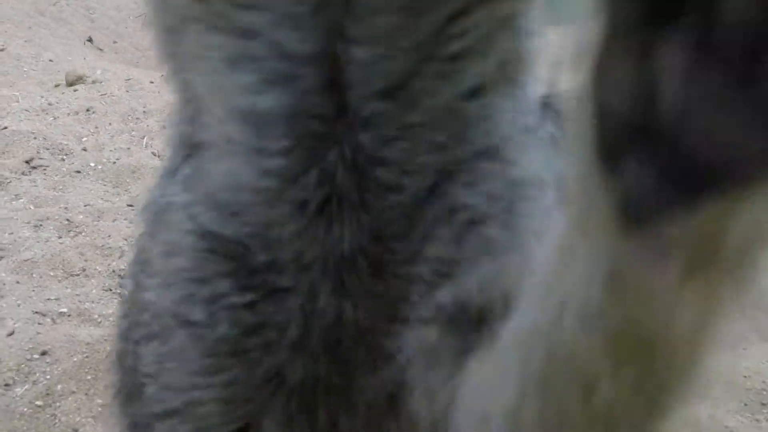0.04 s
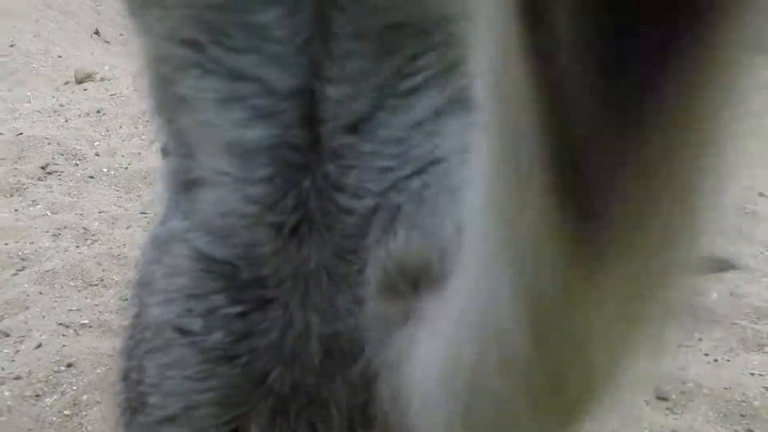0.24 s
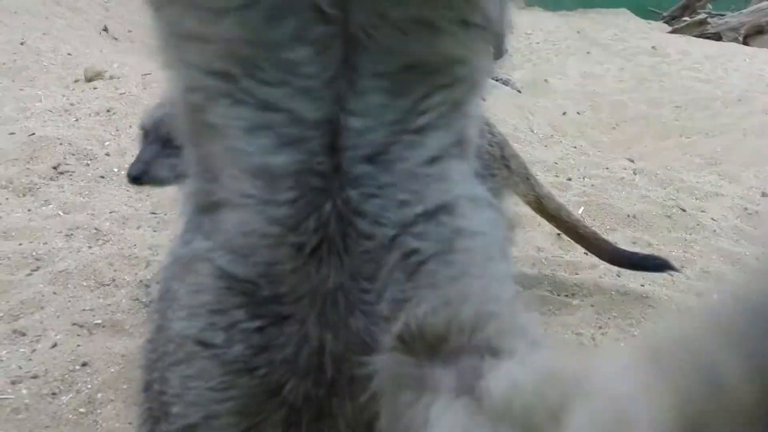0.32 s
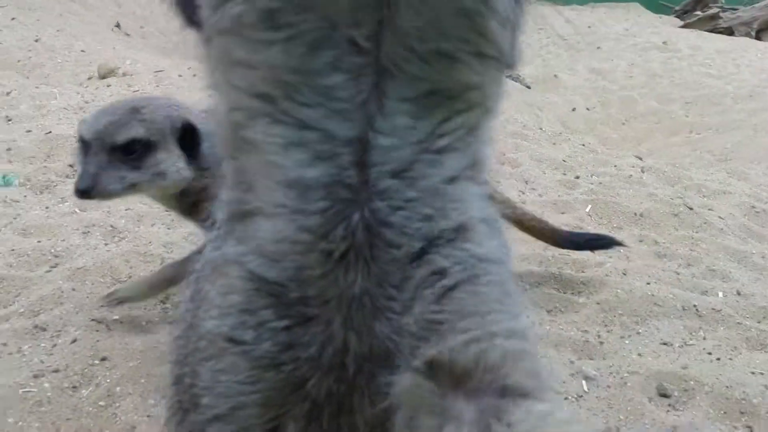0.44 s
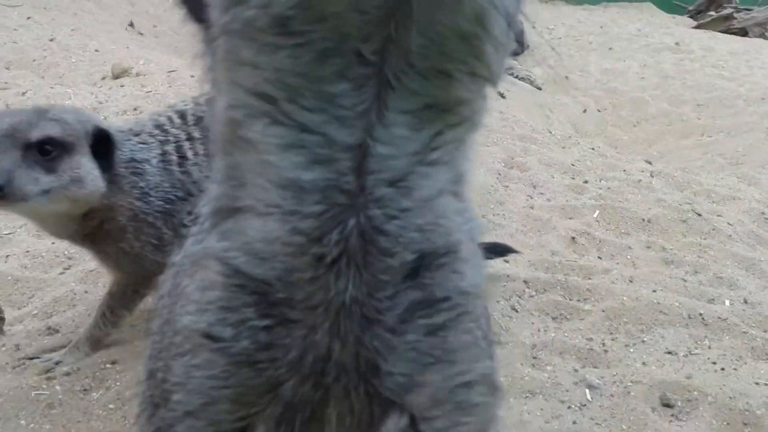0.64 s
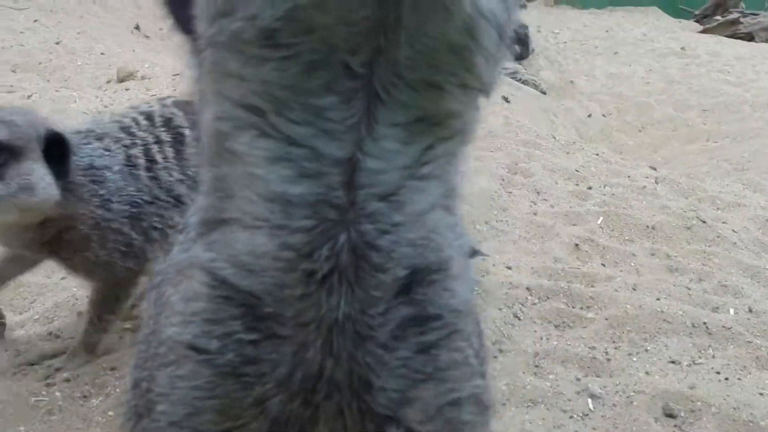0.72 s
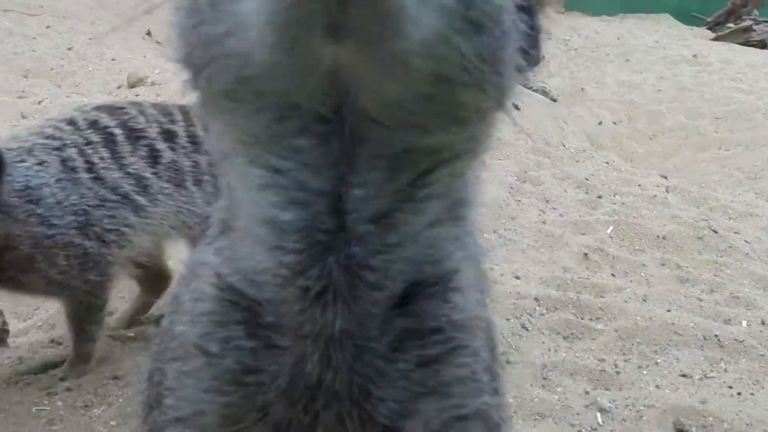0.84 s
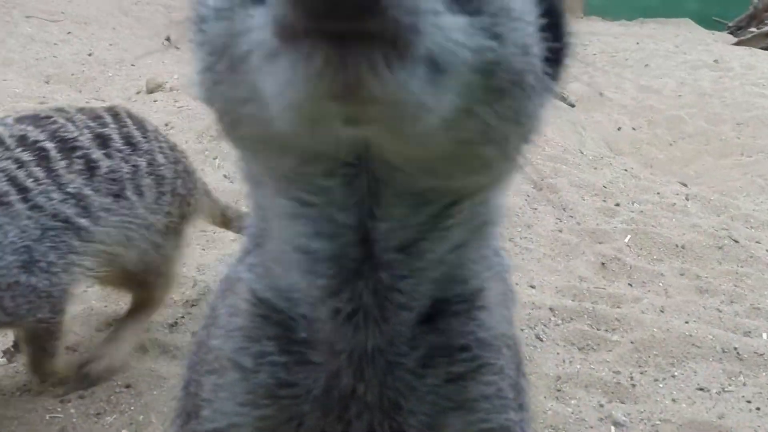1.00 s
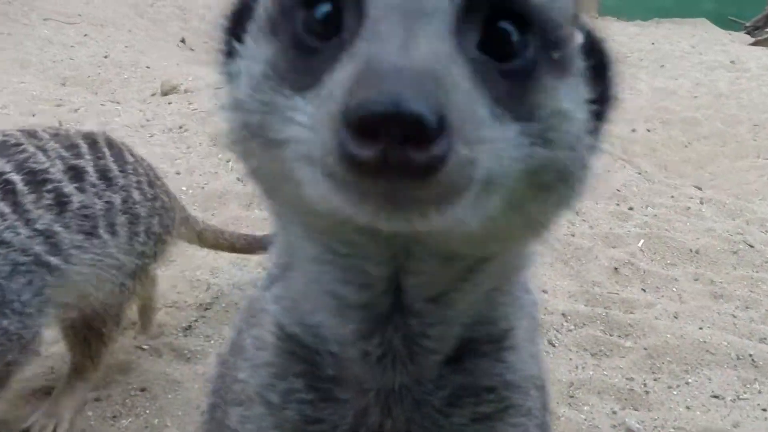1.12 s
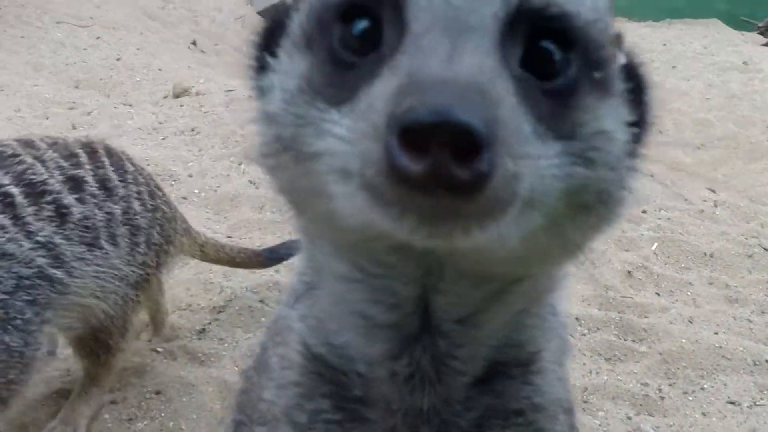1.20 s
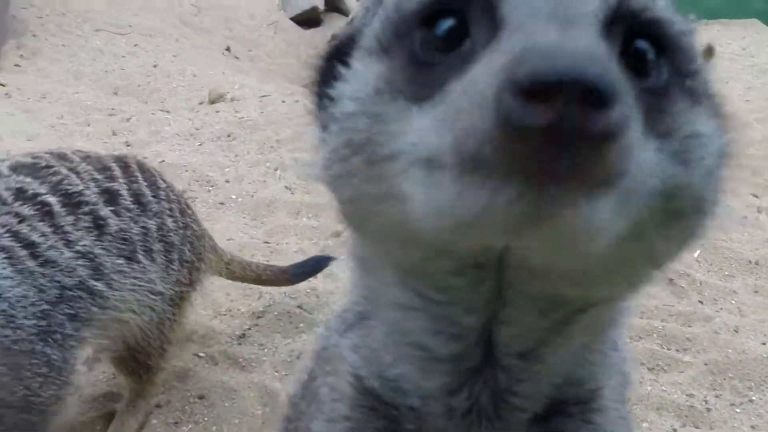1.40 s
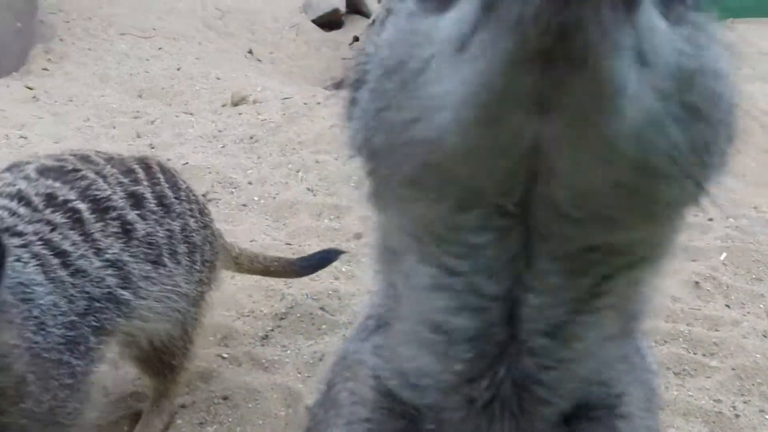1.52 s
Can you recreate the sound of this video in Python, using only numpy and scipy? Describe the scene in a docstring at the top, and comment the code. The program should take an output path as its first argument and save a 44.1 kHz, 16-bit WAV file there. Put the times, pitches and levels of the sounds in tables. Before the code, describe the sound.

A short clatter and scratch of a meerkat's claws on the microphone housing outdoors.

```python
"""A small camera stands on sand in quiet outdoor hiss and low rumble, its electronics faintly whining.
At about 0.22 s a meerkat paws it: the pad lands with a soft bump and rubs along, wobbling the mount.
Claws then clack and skim on the plastic shell, and the camera's gain control ducks under the clatter.
Near 0.34 s one claw drags into a short, snagging scrape that rings the hollow shell.
After that only the hiss, the rumble and the thin whine remain, with a few specks of electronic fizz."""
import sys
import numpy as np
from scipy import signal
from scipy.fft import rfft, irfft
from scipy.io import wavfile
from scipy.ndimage import uniform_filter1d

SR = 44100
rng = np.random.default_rng(int(sys.argv[2]) if len(sys.argv) > 2 else 0)


def generate_wav(signal):
    """Clip the signal to [-1, 1] and save it as 16-bit WAV at the path in sys.argv[1]."""
    frames = np.transpose(np.atleast_2d(signal))
    scaled = np.clip(frames, -1, 1) * 32767
    pcm = np.round(scaled).astype(np.int16)
    wavfile.write(sys.argv[1], SR, pcm)


N = 68355
T = np.arange(N) / SR

# Claw hits. Each row: start in seconds, relative level in dB, tilt in dB per octave,
# damping by the claw in dB per second.
CLAW_HITS = [(0.2446, -3, 3.5, 2999.5), (0.2454, -7, -2, 3000), (.2552, 3.5, 0.5, 1498.5),
             (0.2557, 3.5, 0, 499.5), (0.2562, 2, -0.5, 500), (0.2594, -13, -7, 500.5),
             (.2610, -2.5, 3.5, 499), (0.262, -0.5, -2.5, 500), (0.2634, -3, -0.5, 500),
             (0.2669, -4.5, -1.5, 500), (0.2687, -5, -0.5, 501), (.2725, -6, -8.5, 1001),
             (.2755, -22, 0.5, 1500), (0.3023, -14.5, 3, 2500.5), (0.3036, -8.5, -5.5, 2002.5),
             (0.3076, -24, 6.5, 2499), (0.3113, -18, -2.5, 2500), (.3466, -19, 4.5, 3000),
             (0.3743, -19.5, 0.5, 2500)]
# Ring of the plastic shell. Each row: pitch in Hz, relative level in dB, 60 dB decay time in seconds.
SHELL_MODES = [(1124.4, -7.5, 0.032), (1300, -6, .022), (1638, -7.5, 0.025), (2018, -13, .026),
               (2130, -7, 0.0089), (2440, -3, 0.02), (2770, -8, 0.019), (3263, -5, 0.014),
               (4110, -10.5, 0.014), (4800, -8, 0.011), (6600, -9.5, .011), (7185, -2, .01),
               (7710, 2.5, 0.0056), (9820, -3, .004)]
# Tone of a hit on the shell. Each row: frequency in Hz, relative gain in dB.
HIT_EQ = [(100, -18), (500, -14), (800, -5), (1150, 1), (2500, 7), (3800, 3.5), (6000, 0.5), (7500, -4),
          (8700, -7), (10000, -4.5), (12500, -17)]
# Claw tips brushing the shell. Each row: time in seconds, relative level in dB.
SKIM_LEVELS = [(.228, -60), (.243, -43.5), (.251, -53), (.266, -40.5), (.281, -49.5), (.289, -39.5),
               (.297, -44.5), (.3025, -26), (.308, -42), (.313, -27.5), (.319, -39.5), (.337, -44.5),
               (.345, -57)]
# Tone of that brushing. Each row: frequency in Hz, relative gain in dB.
SKIM_EQ = [(300, -15.5), (600, -5), (850, -10.5), (1200, 2), (1900, 2), (2300, -6), (2800, 4.5), (3600, 1),
           (6000, -8.5), (8200, -8), (9800, -14.5), (12000, -10.5)]
# Pressure of the dragging claw. Each row: time in seconds, relative level in dB.
DRAG_LEVELS = [(.3375, -48), (.3398, -27.5), (.363, -26), (.378, -29), (.388, -29), (.3905, -43.5),
               (.403, -54), (.416, -76)]
# The claw catches and lets go. Each row: time in seconds, strength in dB over the friction.
CLAW_SNAGS = [(0.339, 27), (0.3474, 26), (.3756, 29), (.3860, 20.5)]
# Hollow resonances under the scrape. Each row: centre in Hz, width in Hz, relative gain in dB.
HOLLOW_MODES = [(1590, 156, 5), (1890, 180, 5), (2330, 200, 4.5), (2550, 110, 8.5), (3080, 120, 0.5),
                (3870, 160, 2.5), (4077, 89, 1.5), (10200, 700, -8)]
# Scrape hiss between those resonances. Each row: frequency in Hz, relative gain in dB.
SCRAPE_EQ = [(200, -31), (850, -35), (1300, -19), (2500, -8), (3500, -19), (4700, -20), (7000, -24),
             (7800, -12), (10300, -17), (11100, -45), (12400, -27)]
# Soft pushes of the pad. Each row: centre in seconds, relative level in dB, half-width in seconds.
PAD_PUSHES = [(0.2183, -24.5, 0.00089), (0.2211, -22.5, .0009), (0.2351, -30.5, 0.0023),
              (0.2423, -31.5, 0.0024), (0.2817, -31, 0.00077), (0.3011, -34.5, 0.0017),
              (0.326, -41, 0.0014), (0.3738, -37, 0.0022), (.3800, -52, 0.001)]
# Dull knocks of the paw. Each row: start in seconds, relative level in dB.
PAW_KNOCKS = [(0.2169, -19), (0.2194, -20), (0.3025, -28), (0.3113, -38)]
# Low ring of the camera body. Each row: pitch in Hz, relative level in dB, 60 dB decay time in seconds.
BODY_MODES = [(347, -5, .02), (520, -7.5, .011), (1040, -0.5, .013)]
# Muffled tone of the pad's rub. Each row: frequency in Hz, relative gain in dB.
RUB_EQ = [(100, -11.5), (220, -6), (400, -3.5), (600, -2), (800, -6.5), (1200, -5), (2000, -11),
          (6000, -30)]
# Tone of the outdoor hiss. Each row: frequency in Hz, relative gain in dB.
AIR_EQ = [(20, -86), (180, -90), (330, -90.5), (700, -95), (1300, -99), (2400, -101.5), (3100, -100),
          (4500, -107), (7500, -112.5), (10500, -112), (12400, -116)]
# Tone of the low rumble. Each row: frequency in Hz, relative gain in dB.
RUMBLE_EQ = [(8, -84.5), (20, -71), (35, -73.5), (58, -69.5), (80, -71.5), (103, -87), (145, -75),
             (185, -98), (400, -120)]
# Specks of electronic fizz. Each row: start in seconds, level in dB.
FIZZ_BURSTS = [(.120, -67.5), (.543, -68.5), (.799, -67.5), (.892, -66), (1.140, -66.5), (1.399, -67.5)]
# Thin, peaky tone of the fizz. Each row: frequency in Hz, relative gain in dB.
FIZZ_EQ = [(5000, -19), (8100, -18), (8700, 0), (9250, -16), (9800, -0.5), (10200, 3.5), (10800, -17),
           (12400, -7)]


def claws(level_db=11):
    """Claws clack on the shell and chatter; a claw that stays down chokes the ring."""
    out = np.zeros(N)
    for start, db, tilt_db, damping_db_per_s in CLAW_HITS:
        hit = colour(shell_hit(), HIT_EQ, tilt_db)
        hit = hit * amp(-damping_db_per_s * T[:len(hit)])
        add(out, start, amp(db + level_db) * hit / np.linalg.norm(hit))
    return out


def shell_hit(crack_db=2, crack_t60_s=0.0085, rattle_db=-29, rattle_t60_s=0.054):
    """Struck plastic: a sharp crack, short modes of alternating sign and a faint rattle, at energy 1."""
    t = T[:4096]
    ring = sum((-1) ** k * decay(t, db, t60) * np.sin(2 * np.pi * hz * t)
               for k, (hz, db, t60) in enumerate(SHELL_MODES))
    noise_fade = decay(t, crack_db, crack_t60_s) + decay(t, rattle_db, rattle_t60_s)
    hit = ring + noise_fade * rng.standard_normal(len(t))
    return hit / np.linalg.norm(hit)


def scrape(level_db=4, low_cut_hz=1300, high_cut_hz=8000):
    """A claw drags hard over the plastic and snags, ringing the hollow shell."""
    drag = friction()
    for start, db in CLAW_SNAGS:
        add(drag, start, amp([db]))  # a one-sample click
    ring = sum(amp(db) * resonate(drag, hz, width) for hz, width, db in HOLLOW_MODES)
    ring = signal.sosfilt(signal.butter(4, low_cut_hz, "high", fs=SR, output="sos"), ring)
    ring = signal.sosfilt(signal.butter(1, high_cut_hz, fs=SR, output="sos"), ring)
    hiss = colour(friction(), SCRAPE_EQ)
    return amp(level_db) * envelope(DRAG_LEVELS) * unit(ring + hiss)


def skim(level_db=2):
    """Claw tips brush lightly over the plastic between hits."""
    return amp(level_db) * envelope(SKIM_LEVELS) * unit(colour(friction(), SKIM_EQ))


def friction(slips_per_s=2500, spread_db=4, grit_gain=0.33):
    """Claw on plastic: a dense crackle of tiny slips in fine grit, at rms 1."""
    slipping = rng.random(N) < slips_per_s / SR
    slips = slipping * amp(spread_db * rng.standard_normal(N)) * rng.choice([-1, 1], N)
    return unit(unit(slips) + grit_gain * rng.standard_normal(N))


def paw(push_db=2, rebound_s=0.0035, rebound_gain=0.28, shell_db=7.5):
    """The soft pad shoves the camera, which springs back; knocks ring the body and, faintly, the shell."""
    out = np.zeros(N)
    for centre, db, width in PAD_PUSHES:
        push = np.exp(-((T - centre) / width) ** 2)
        rebound = np.exp(-((T - centre - rebound_s) / (2 * width)) ** 2)
        out += amp(db + push_db) * (rebound_gain * rebound - push)
    body = sum(decay(T, db, t60) * np.sin(2 * np.pi * hz * T) for hz, db, t60 in BODY_MODES)
    for start, db in PAW_KNOCKS:
        dull_hit = colour(shell_hit(), HIT_EQ, tilt_db=-5)
        add(out, start, -amp(db) * body)
        add(out, start, amp(db + shell_db) * dull_hit / np.linalg.norm(dull_hit))
    return out


def wobble(level_db=-40.5, mount_hz=134, width_hz=38, start_s=0.22, end_s=0.409, fade_s=0.035):
    """The sliding paw shakes the mount at its low resonance."""
    fade = np.clip(np.minimum(T - start_s, end_s - T) / fade_s, 0, 1)
    shake = resonate(rng.standard_normal(N), mount_hz, width_hz)
    shake = resonate(shake, mount_hz, width_hz)  # a second pass tightens the hum
    return amp(level_db) * fade * unit(shake)


def rub(level_db=-44, fade_db_per_s=59.5, end_s=0.385):
    """From the first touch the pad slides dully over the shell, fading."""
    since_touch = T - PAW_KNOCKS[0][0]
    touching = (since_touch > 0) * (T < end_s)
    return touching * amp(level_db - fade_db_per_s * since_touch) * noise(RUB_EQ)


def outdoors(air_db=-59.5, air_swell_db=-0.06, rumble_db=-53.5, rumble_swell_db=2):
    """The outdoor bed: smooth distant hiss over a lumpy low rumble."""
    air = noise(AIR_EQ) * amp(air_db + air_swell_db * drift(rate_hz=4.6))
    rumble = noise(RUMBLE_EQ) * amp(rumble_db + rumble_swell_db * drift(rate_hz=12))
    return air + rumble


def electronics(whine_hz=11300, jitter_hz=35, whine_db=-75, octave_db=-78.5, pulse_hz=29, fizz_s=0.038):
    """The camera's circuits give off a thin pulsing whine, its lower octave and short bursts of fizz."""
    pulse = np.clip(0.2 + 1.2 * np.cos(2 * np.pi * pulse_hz * (T - 0.047)), 0, 1)
    phase = 2 * np.pi * np.cumsum(whine_hz + jitter_hz * drift(rate_hz=240)) / SR
    whine = pulse * (amp(whine_db) * np.sin(phase) + amp(octave_db) * np.sin(phase / 2))
    bursts = sum(amp(db) * ((T > start) & (T < start + fizz_s)) for start, db in FIZZ_BURSTS)
    fizz = uniform_filter1d(bursts, size=200) * noise(FIZZ_EQ)
    return whine + fizz


def amp(db):
    """Decibels to gain."""
    return 10 ** (np.asarray(db) / 20)


def unit(x):
    """Scales to rms 1."""
    return x / np.sqrt(np.mean(x ** 2) + 1e-20)


def add(mix, start_s, sound):
    """Drops a sound into the mix at its start time."""
    part = mix[round(start_s * SR):][:len(sound)]
    part += sound[:len(part)]


def decay(t, db, t60):
    """A tail that starts at db and falls 60 dB every t60 seconds."""
    return amp(db - 60 * t / t60)


def envelope(points):
    """A fader ride through (seconds, dB) points, silent outside them."""
    return amp(np.interp(T, *np.transpose(points), left=-np.inf, right=-np.inf))


def resonate(x, hz, width_hz):
    """A two-pole resonance with a peak gain of 1."""
    return signal.lfilter(*signal.iirpeak(hz, hz / width_hz, fs=SR), x)


def colour(x, eq, tilt_db=0, size=8192):
    """EQ through (Hz, dB) points; above 800 Hz it tilts by tilt_db per octave, pivoting at 3 kHz."""
    hz = np.fft.rfftfreq(size, 1 / SR) + 1
    eq_hz, eq_db = np.transpose(eq)
    octaves = np.log2(np.maximum(hz, 800) / 3000)
    gain_db = np.interp(np.log(hz), np.log(eq_hz), eq_db) + tilt_db * octaves
    cepstrum = irfft(np.log(amp(gain_db)))
    # Fold to minimum phase, so nothing rings ahead of an attack.
    cepstrum[1:size // 2] *= 2
    cepstrum[size // 2 + 1:] = 0
    impulse = irfft(np.exp(rfft(cepstrum)))[:size // 2]
    return signal.fftconvolve(x, impulse)[:len(x)]


def noise(eq):
    """Steady noise through an EQ curve, at rms 1."""
    return unit(colour(rng.standard_normal(N), eq))


def drift(rate_hz):
    """Random motion of rms 1, mostly in the octaves below the given rate."""
    ratio = np.fft.rfftfreq(N, 1 / SR) / rate_hz
    spectrum = rfft(rng.standard_normal(N)) * np.sqrt(ratio) / (1 + ratio ** 4)
    return unit(irfft(spectrum, N))


def scene():
    """The mono mix at the camera's microphone."""
    return (claws() + skim() + scrape() + paw() + rub() + wobble() + outdoors() + electronics())[None]


def record(dry, knee_db=-33, duck_slope=0.24, recover_db_per_s=82, ceiling=0.88, high_cut_hz=12600):
    """Gain control ducks under the clatter and recovers; peaks clip; the top end is cut off."""
    power = uniform_filter1d(dry[0] ** 2, size=200)
    power_db = 10 * np.log10(abs(power) + 1e-12)
    fall_db = T * recover_db_per_s
    held_db = np.maximum.accumulate(power_db + fall_db) - fall_db  # jumps to each peak, then sinks
    over_db = np.maximum(held_db - knee_db, 0)
    duck_db = duck_slope * uniform_filter1d(over_db, size=100)
    clipped = np.clip(dry / amp(duck_db), -ceiling, ceiling)
    high_cut = signal.firwin(255, high_cut_hz, window=("kaiser", 9), fs=SR)
    return signal.oaconvolve(clipped, high_cut[None], "same")


dry = scene()
out = record(dry)
generate_wav(out)
```